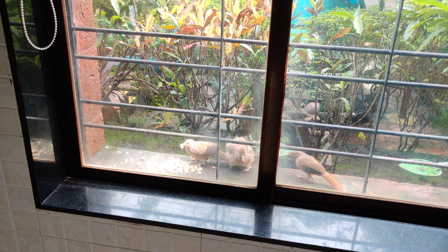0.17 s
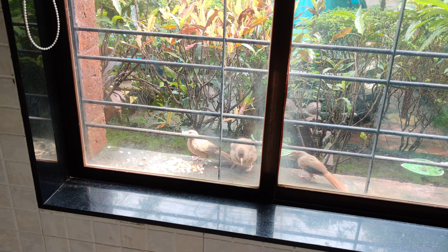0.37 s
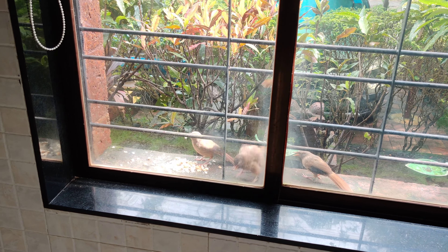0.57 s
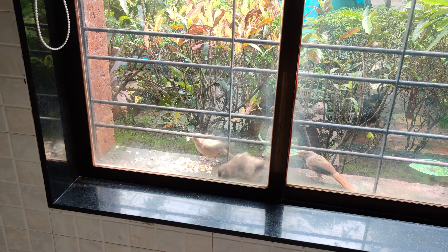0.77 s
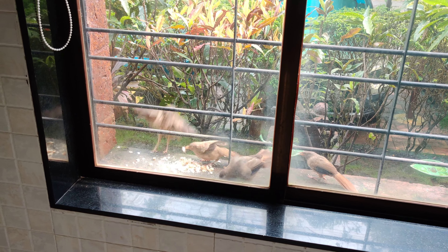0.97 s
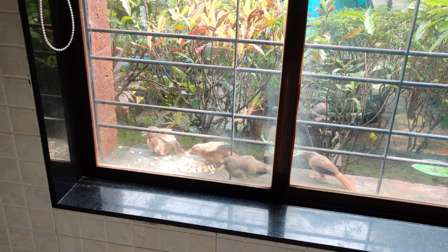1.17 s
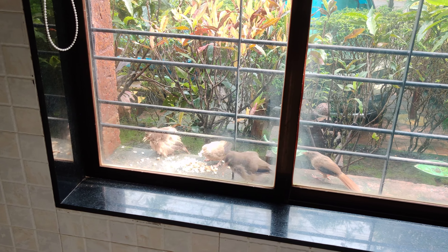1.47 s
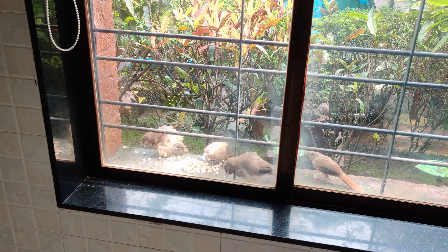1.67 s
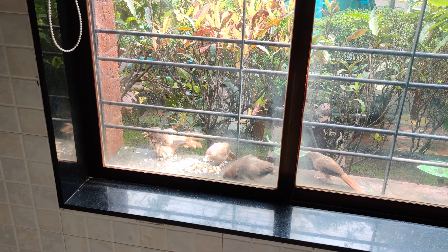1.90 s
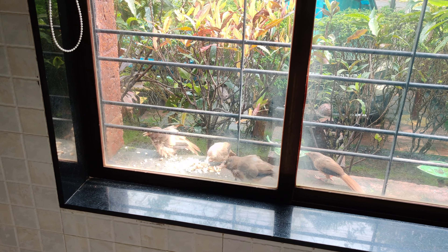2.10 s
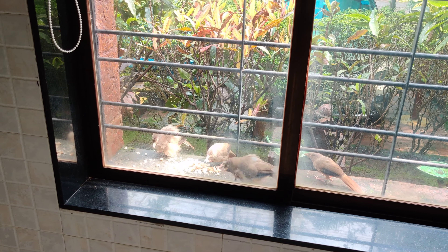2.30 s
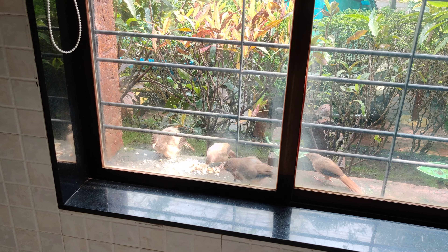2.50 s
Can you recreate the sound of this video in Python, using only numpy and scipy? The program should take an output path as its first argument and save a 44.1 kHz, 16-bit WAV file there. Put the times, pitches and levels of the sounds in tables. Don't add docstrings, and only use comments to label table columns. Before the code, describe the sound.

Small birds chatter harshly behind a window. From 0 to 0.8 s quick scratchy notes swell, with faint low coos from 0.2 s. From about 0.4 s bright wheezes with sharp chips join, and from 0.64 s lower hoarse rasps alternate and overlap, strongest around 1.4-1.9 s. Calls fade after 2.2 s, leaving tiled-room ring, quiet air, a faint low motor hum and two distant whistles near 2.55 and 2.65 s.

```python
import sys
import numpy as np
from scipy import signal
from scipy.fft import rfft, irfft
from scipy.io import wavfile
from scipy.ndimage import uniform_filter1d

SR = 44100
rng = np.random.default_rng(int(sys.argv[2]) if len(sys.argv) > 2 else 0)


def field_ratio(decibels):
    return 10 ** (np.asarray(decibels, dtype=float) / 20)


def log_audio(samples):
    frames = np.atleast_2d(samples).T
    limited = np.clip(frames, -1, 1)
    pcm = np.round(limited * 32767).astype(np.int16)
    wavfile.write(sys.argv[1], SR, pcm)


N = 116865


def evened(x):
    return x / np.sqrt(np.mean(x ** 2) + 1e-20)


def read(points, hz):
    f, value = np.transpose(points)
    return np.interp(np.log(hz + 1), np.log(f + 1), value)


def add(mix, s, sound):
    at = round(s * SR)
    sound = sound[max(-at, 0):]
    part = mix[max(at, 0):][:len(sound)]
    part += sound[:len(part)]


def wander(count, hz):
    span = max(int(SR / hz / 2), 1)
    noise = rng.standard_normal(N // 4)
    smooth = uniform_filter1d(uniform_filter1d(noise, span), span)
    return evened(smooth)[:count]


def slow_wander(hz):
    return np.interp(np.arange(N), np.arange(N // 4) * 4, wander(N, hz))


def resonate(x, hz, width):
    turn = np.exp(2j * np.pi * np.cumsum(hz * np.ones(len(x))) / SR)
    r = np.exp(-np.pi * width / SR)
    smooth = signal.lfilter([(1 - r) ** 2], [1, -2 * r, r * r], x / turn)
    return 2 * (turn * smooth).real


def pair(a, b):
    # f/Hz, likeness (-1 to 1)
    likeness = [(60, 0.22), (240, 0.99), (950, 0.25), (3770, -0.23), (15000, -0.1)]
    hz = np.fft.rfftfreq(a.shape[-1], 1 / SR)
    same = np.clip(read(likeness, hz), -1, 1)
    left = rfft(a)
    right = same * left + np.sqrt(1 - same ** 2) * rfft(b)
    return irfft(np.array([left, right]), a.shape[-1])


def early(x):
    t = np.arange(4096) / SR
    t60 = 0.022
    noise = rng.standard_normal((2, 4096))
    sparse = rng.random((2, 4096)) < .1
    taps = pair(*(noise * sparse * field_ratio(-60 * t / t60)))
    straight = t == 0
    taps = taps / np.linalg.norm(taps[0]) + straight
    return signal.fftconvolve(x[None], taps / np.linalg.norm(taps[0]), axes=1)[:, :N]


def room(x):
    # f/Hz, time to fall by 60 dB/s
    ring = [(300, 0.72), (1000, 0.62), (3000, 0.72), (6000, 0.73), (12000, 0.5)]
    taps = np.zeros((2, SR))
    at = np.arange(60, SR - 20, 20) + rng.integers(0, 20, (2, (SR - 61) // 20))
    np.put_along_axis(taps, at, rng.choice([-1., 1.], at.shape), 1)
    hz, t, z = signal.stft(taps, SR, nperseg=256)
    fading = z * field_ratio(-60 * t / read(ring, hz)[:, None])
    tail = pair(*signal.istft(fading, SR, nperseg=256)[1][:, :SR])
    return signal.fftconvolve(x[None], tail / np.linalg.norm(tail[0]), axes=1)[:, :N]


def glass(x):
    return signal.sosfilt(signal.butter(4, 538, "high", fs=SR, output="sos"), x.T)


def call(row, voice, throat, low):
    length, level_db, hz, beak_hz, *depth_db = row
    rise, swell_db, fall, sag, jitter, rough, pure_swell_db = voice
    rattle_db, rattle_hz, pure_jitter = 2.8, 70, .008
    t = np.arange(0, length + 4 * fall, 1 / SR)
    progress = np.minimum(t / length, 1)
    pitch = hz * (1 + sag * (.5 - progress))

    turns = np.cumsum(pitch * (1 + jitter * wander(len(t), 200))) / SR
    folds = sum(np.cos(2 * np.pi * k * turns) for k in range(1, int(14000 / hz)))
    puffs = (0.26 + np.exp(-(turns % 1) / 0.23)) * rng.standard_normal(N // 4)[:len(t)]
    drive = (1 - rough) * evened(folds) + rough * evened(puffs)
    drive = drive * field_ratio(rattle_db * wander(len(t), rattle_hz))

    tone = np.zeros(len(t))
    for i, (k, width, db) in enumerate(throat):
        tone += (-1) ** i * field_ratio(db) * evened(resonate(drive, k * beak_hz, width))

    glide = 2 * np.pi * np.cumsum(pitch * (1 + pure_jitter * wander(len(t), 50))) / SR
    pure_swell = pure_swell_db * (t / length - .5)
    for k, width, breathy_db, pure_db in low:
        tone += field_ratio(breathy_db + sum(depth_db)) * evened(resonate(drive, k * pitch, width))
        tone += field_ratio(pure_db + sum(depth_db) + pure_swell) * np.cos(k * glide)

    shape = np.minimum(t / rise, 1) * field_ratio(swell_db * (progress - .5))
    shape = shape * np.exp(-np.maximum(t - length, 0) / fall)
    return field_ratio(level_db) * shape * evened(tone)


def bird(starts, rows, voice, throat, low):
    direct_db, room_db = -2, 0.5
    out, dry_calls = np.zeros((N, 2)), np.zeros(N)
    for s, row in zip(starts, rows):
        sound = call(row, voice, throat, low)
        add(dry_calls, s, sound)
        add(out, s, field_ratio(direct_db) * early(sound).T)
    return glass(out + field_ratio(room_db) * room(dry_calls).T)


def glides(rows):
    out = np.zeros(N)
    for start, length, level_db, hz, end_hz in rows:
        u = np.arange(0, length, 1 / SR) / length
        level = field_ratio(level_db - 3.0 + 2.4 * wander(len(u), 33))
        wave = np.sin(2 * np.pi * np.cumsum(hz + (end_hz - hz) * u) / SR)
        add(out, start, level * np.sin(np.pi * u) ** 0.23 * wave)
    return out


def wash():
    # f/Hz, level/dB
    colour = [(25, 3), (70, -15.5), (130, -16), (350, -10.5), (700, -10), (2000, -28), (4000, -25),
              (8000, -35)]
    air_db, rumble_db, gust_db, rumble_hz = -52.5, -69, 3, 22
    a, b, c, d = rng.standard_normal((4, N))
    hz = np.fft.rfftfreq(N, 1 / SR)
    air = evened(irfft(rfft(pair(a, b)) * field_ratio(read(colour, hz)), N))
    rumble = evened(irfft(rfft(pair(c, d)) * hz / (1 + (hz / rumble_hz) ** 3), N))
    return field_ratio(air_db) * air + field_ratio(rumble_db + gust_db * slow_wander(9.5)) * rumble


def hum():
    # t/s, f/Hz, level/dB
    course = [(0.0, 95.2, -69.5), (1.5, 93, -65.5), (1.899, 92.7, -62), (2.3, 92, -62), (2.65, 91.4, -67.5)]
    s, hz, db = np.transpose(course)
    t = np.arange(N) / SR
    level = field_ratio(np.interp(t, s, db) + 2.8 * slow_wander(20))
    return np.sqrt(2) * level * np.sin(2 * np.pi * np.cumsum(np.interp(t, s, hz)) / SR)


def chatter():
    starts = [0, .068, .183, .293, .408, .54, .668]
    # length/s, level/dB, pitch f/Hz, beak resonance f/Hz, low partials level/dB
    rows = [
        (0.021, -38, 900, 3100, -5),
        (.06, -37, 985, 4640, 4),
        (0.061, -34.5, 980, 4720, 2.5),
        (.07, -32, 1002, 4710, -3.5),
        (.09, -31, 980, 4650, -1.5),
        (.08, -26, 950, 4670, -11),
        (.15, -28.5, 754.8, 4760, -7.5),
    ]
    # rise/s, swell/dB, fall/s, pitch sag (share), jitter (share), roughness (0-1), pure swell/dB
    voice = (.012, -2, .02, .4, .13, .75, -8)
    # multiple of beak resonance, width/Hz, level/dB
    throat = [(0.297, 1240, -11.5), (0.524, 850, -7.5), (.75, 1370, -5.5), (1.002, 1280, -4),
              (1.328, 1530, -10), (1.8, 2200, -16.5), (2.75, 2140, -27.5)]
    # multiple of pitch, width/Hz, breathy level/dB, pure level/dB
    low = [(1, 630, -14, -10), (2, 380, -20.5, -13)]
    return bird(starts, rows, voice, throat, low)


def coos():
    # t/s, length/s, level/dB, pitch f/Hz, end pitch f/Hz
    rows = [
        (.22, .2, -51, 184, 182),
        (.45, 0.12, -57, 192, 193.7),
        (.69, 0.09, -55.5, 166, 160),
        (.8, 0.064, -52, 191, 172),
        (1.14, 0.095, -54.5, 159, 160),
    ]
    return glides(rows)


def wheezes():
    starts = [.415, .672, .91, 1.11, 1.385, 1.588, 1.76, 1.82, 1.96, 2.07, 2.235]
    # length/s, level/dB, pitch f/Hz, beak resonance f/Hz
    rows = [(.075, -30, 1500, 4590), (.15, -28, 970, 4260), (0.14, -25.5, 1060, 4220),
            (.155, -27.5, 990, 4070), (0.12, -25, 1100, 4170), (.15, -27.5, 950, 4050),
            (0.06, -27.5, 840, 4090), (0.13, -28, 880, 4180), (0.079, -27, 1260, 4140),
            (0.12, -31.5, 1050, 4195), (0.1, -36, 830, 3980)]
    # rise/s, swell/dB, fall/s, pitch sag (share), jitter (share), roughness (0-1), pure swell/dB
    voice = (0.017, 0, 0.021, 0, .16, 0.92, 0)
    # multiple of beak resonance, width/Hz, level/dB
    throat = [(0.798, 1260, -12.5), (1.004, 546, -4), (1.35, 2050, -16.5), (1.95, 2470, -25.5),
              (2.72, 1850, -30)]
    # multiple of pitch, width/Hz, breathy level/dB, pure level/dB
    low = [(0.919, 574, -21.5, -55)]
    return bird(starts, rows, voice, throat, low)


def chips():
    # t/s, peak level/dB, beak resonance f/Hz
    rows = [(0.4234, -31, 4700), (0.4597, -21, 4580), (0.4894, -32, 4370), (0.5598, -22, 4140),
            (0.6802, -13, 4330), (0.7345, -18.5, 4200), (0.7637, -22, 4360), (0.9184, -17, 4300),
            (1.004, -29, 4040), (1.038, -25, 4220), (1.142, -34, 4150), (1.1689, -19.5, 4170),
            (1.1994, -16, 3970), (1.2397, -25, 4320), (1.4234, -11, 3900), (1.476, -17.5, 4160),
            (1.5094, -30, 4200), (1.5993, -10, 3900), (1.6495, -14, 4270), (1.6758, -9.5, 4200),
            (1.7144, -12.5, 4250), (1.75, -17, 4170), (1.8188, -25, 4280), (1.8476, -17, 4090),
            (1.879, -9, 4330), (1.8898, -11, 4140), (1.9244, -20, 4280), (1.9919, -32, 4360),
            (2.0593, -18.5, 4510), (2.0991, -20, 4340), (2.125, -19, 4080), (2.1544, -22, 4080),
            (2.1894, -36, 3840), (2.2993, -30, 3970), (2.3583, -30, 3870)]
    # rise/s, swell/dB, fall/s, pitch sag (share), jitter (share), roughness (0-1), pure swell/dB
    voice = (.003, -2.7, .005, -0.31, -0.057, 0.78, 0)
    # multiple of beak resonance, width/Hz, level/dB
    throat = [(.7, 1490, -8), (1.002, 340, -2), (1.4, 2000, -32)]
    length, trim_db, pitch_hz = 0.012, -14, 1038
    out = np.zeros((N, 2))
    for s, db, beak_hz in rows:
        sound = call((length, db + trim_db, pitch_hz, beak_hz), voice, throat, [])
        add(out, s, early(sound).T)
    return glass(out)


def hoarse():
    starts = [.64, .885, 1.11, 1.37, 1.62, 1.805, 2.04, 2.25]
    # length/s, level/dB, pitch f/Hz, beak resonance f/Hz, low partials level/dB
    rows = [
        (0.16, -32.5, 725, 2670, -3.5),
        (.15, -26.5, 647, 1880, -2.5),
        (.15, -27, 633, 2840, 1),
        (.162, -29, 632, 2750, 3.5),
        (.112, -28.5, 640, 2670, -4.5),
        (.152, -27.5, 645, 2670, 2),
        (.147, -29.5, 627, 2560, 0.5),
        (0.14, -40, 600, 2650, -2),
    ]
    # rise/s, swell/dB, fall/s, pitch sag (share), jitter (share), roughness (0-1), pure swell/dB
    voice = (0.006, 1.5, 0.014, .03, .09, 0.48, -3)
    # multiple of beak resonance, width/Hz, level/dB
    throat = [(0.348, 990, -7), (0.629, 1170, -4.5), (1, 1290, 3.5), (1.398, 1800, -1), (2.198, 2340, -10),
              (2.9, 2600, -16.5)]
    # multiple of pitch, width/Hz, breathy level/dB, pure level/dB
    low = [(1, 194, -16, -12.5), (2, 190, -29.5, -20), (3, 310, -24, -24)]
    return bird(starts, rows, voice, throat, low)


def whistles():
    # t/s, length/s, level/dB, pitch f/Hz, end pitch f/Hz
    rows = [
        (2.544, 0.035, -51.5, 1750, 1650),
        (2.635, 0.046, -50, 1945, 1950),
    ]
    return glides(rows)


def scene():
    birds = chatter() + wheezes() + chips() + hoarse()
    return wash() + hum() + birds + coos() + whistles()


def top_cut(x):
    return signal.sosfilt(signal.butter(12, 15800, fs=SR, output="sos"), x)


def record(dry):
    # f/Hz, left minus right level/dB
    balance = [(60, 2.5), (240, 4), (950, 3), (3770, 3.5), (15000, -7.5)]
    dip_hz, dip_width_hz, dip_db = 9270, 2000, -2.5
    hz = np.fft.rfftfreq(N, 1 / SR)
    lean = read(balance, hz) / 2
    dip = dip_db * np.exp(-((hz - dip_hz) / dip_width_hz) ** 2)
    mix = irfft(rfft(dry) * field_ratio(np.array([lean, -lean]) + dip), N)
    return top_cut(mix)


dry = scene()
out = record(dry)
log_audio(out)
```